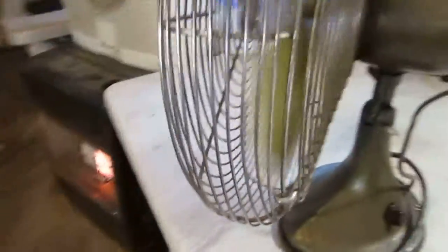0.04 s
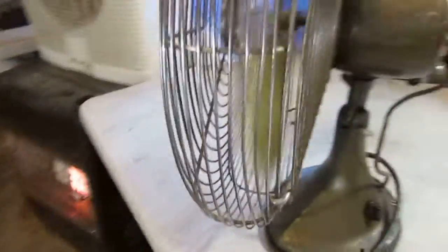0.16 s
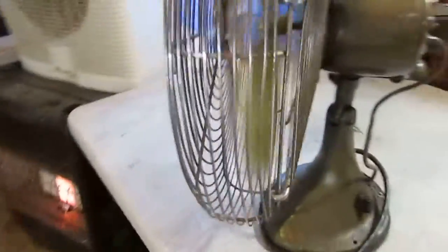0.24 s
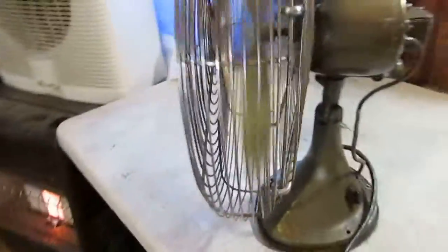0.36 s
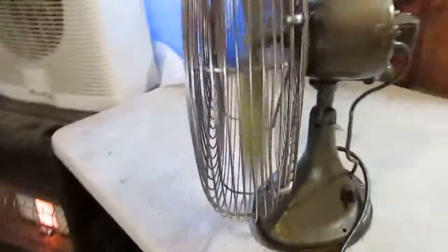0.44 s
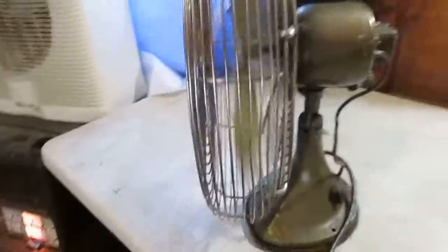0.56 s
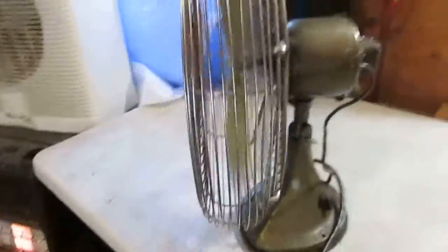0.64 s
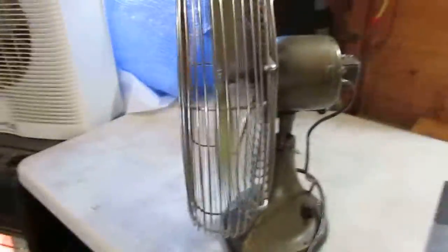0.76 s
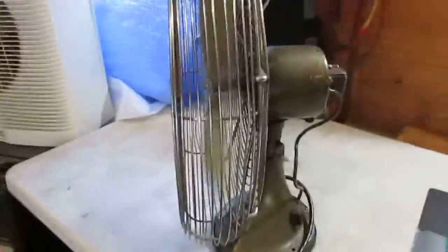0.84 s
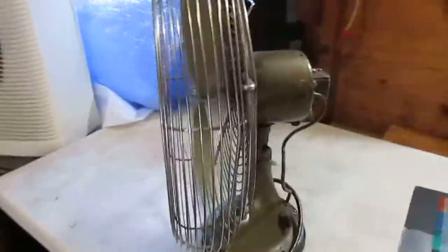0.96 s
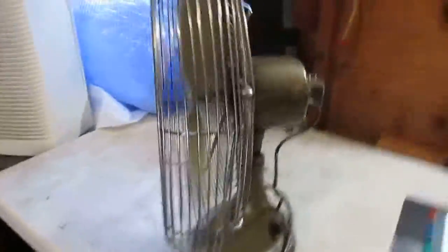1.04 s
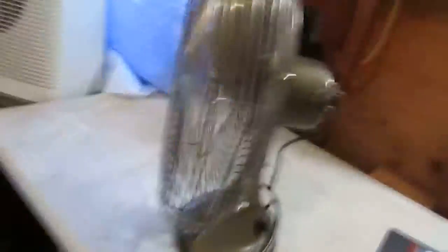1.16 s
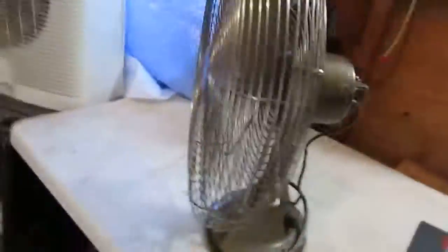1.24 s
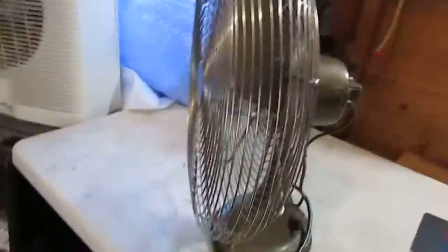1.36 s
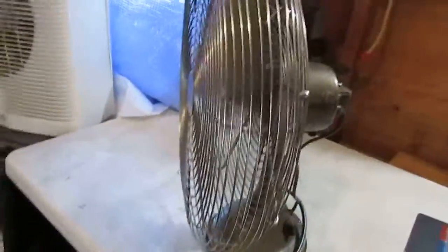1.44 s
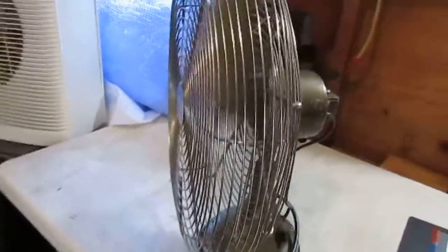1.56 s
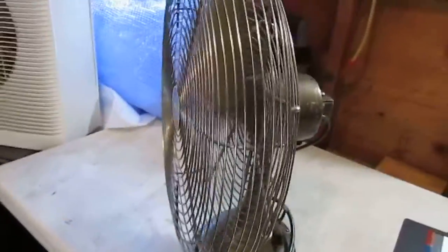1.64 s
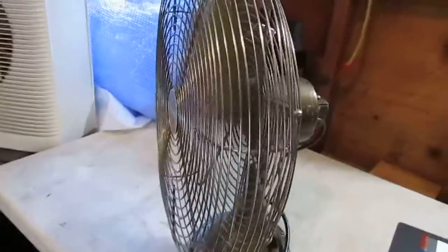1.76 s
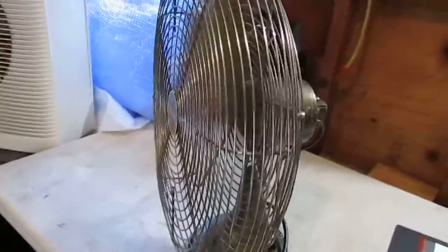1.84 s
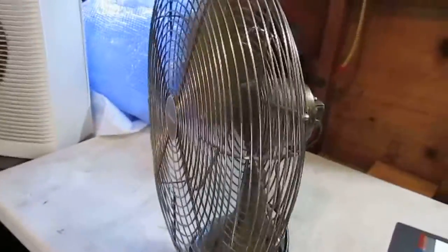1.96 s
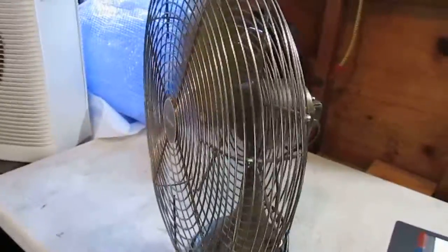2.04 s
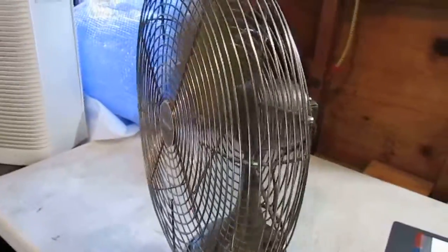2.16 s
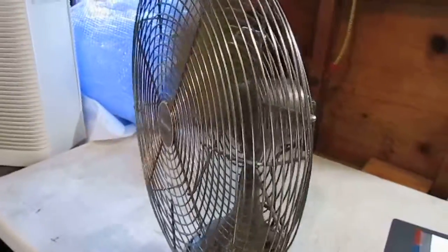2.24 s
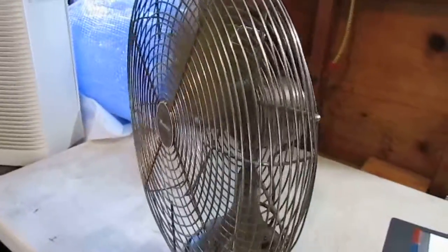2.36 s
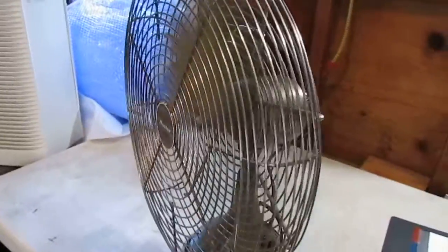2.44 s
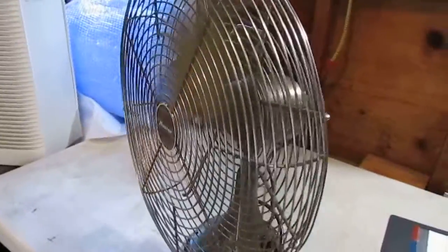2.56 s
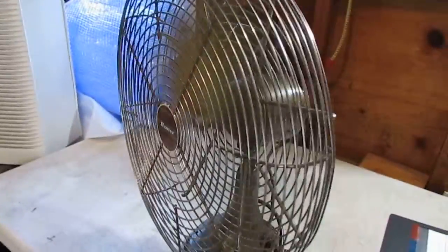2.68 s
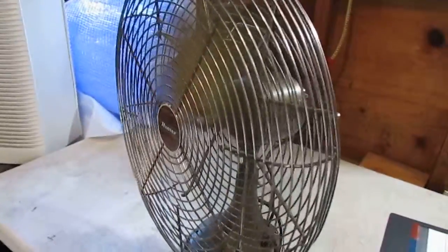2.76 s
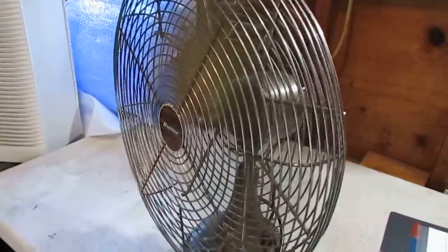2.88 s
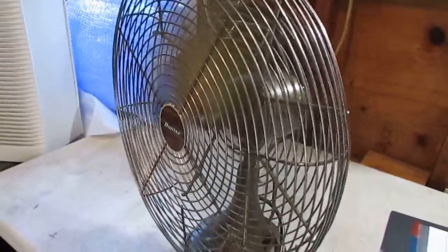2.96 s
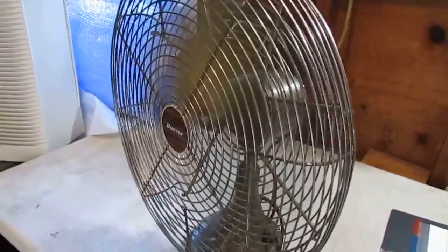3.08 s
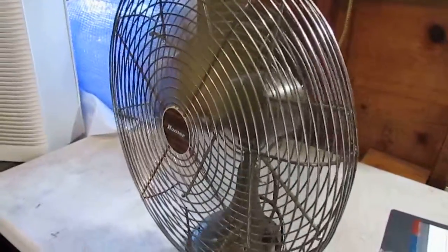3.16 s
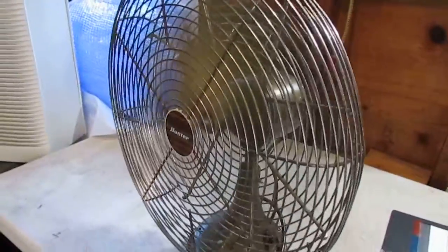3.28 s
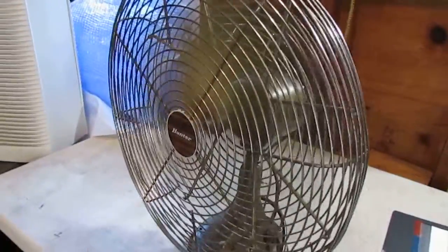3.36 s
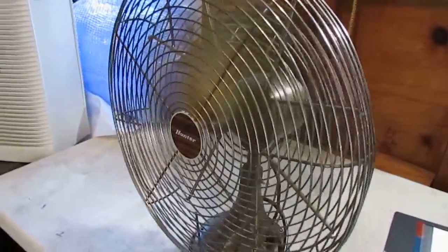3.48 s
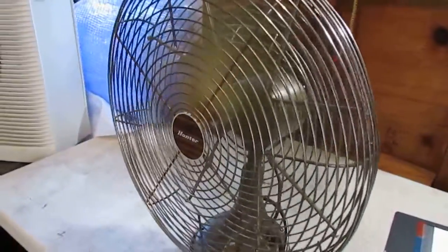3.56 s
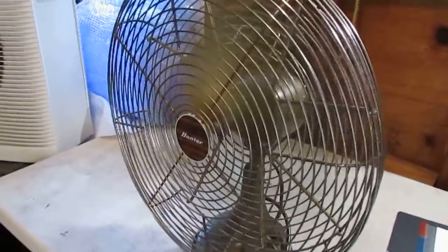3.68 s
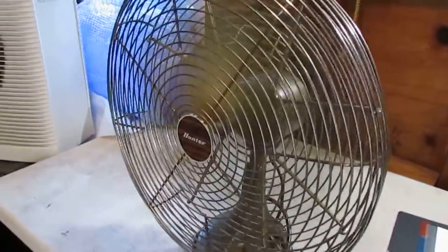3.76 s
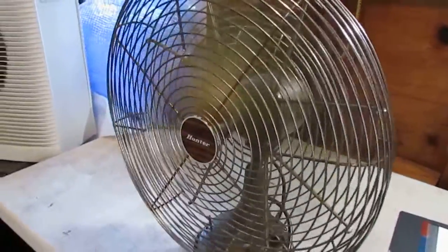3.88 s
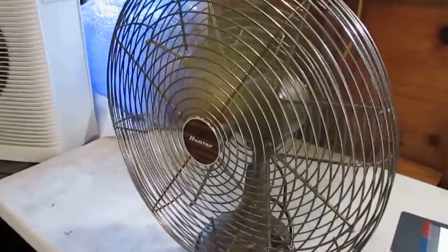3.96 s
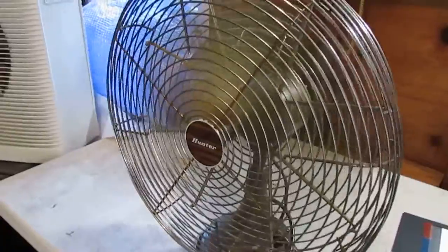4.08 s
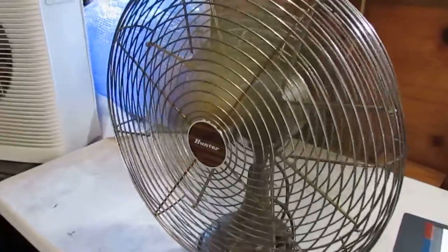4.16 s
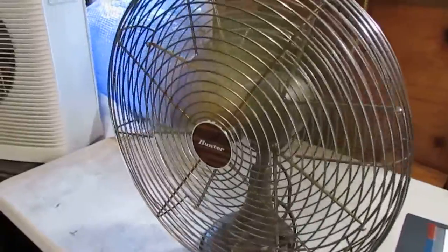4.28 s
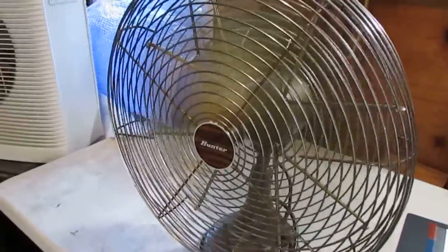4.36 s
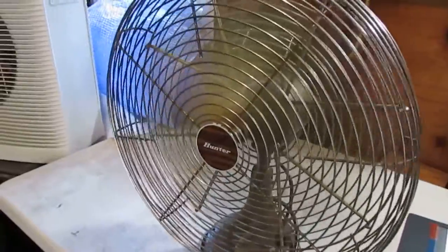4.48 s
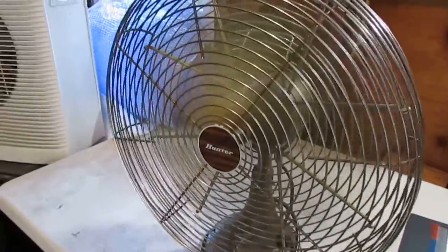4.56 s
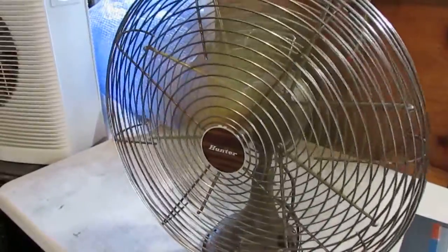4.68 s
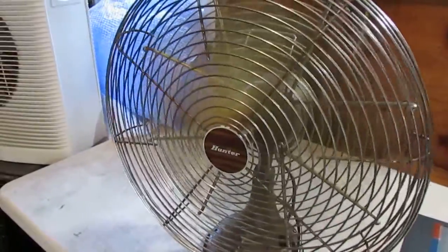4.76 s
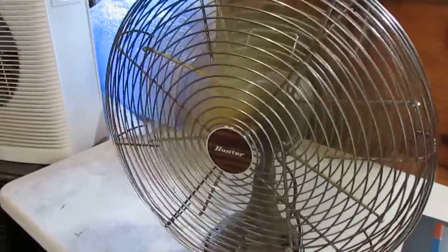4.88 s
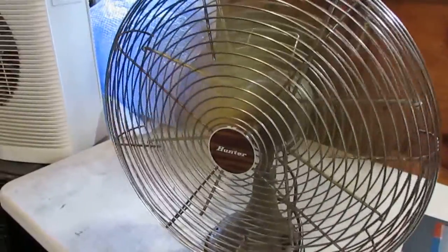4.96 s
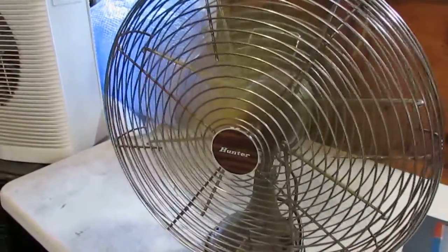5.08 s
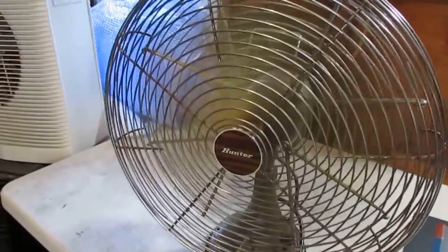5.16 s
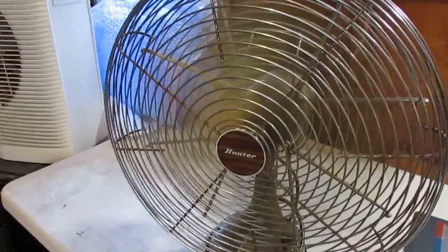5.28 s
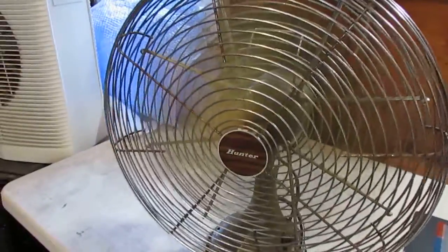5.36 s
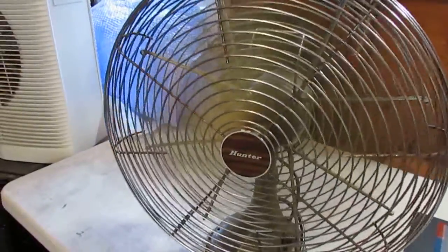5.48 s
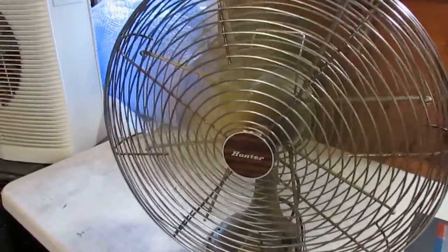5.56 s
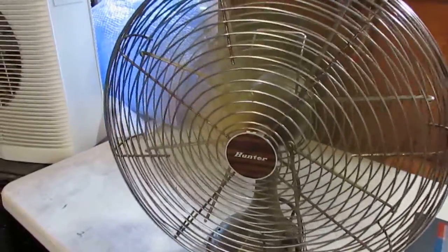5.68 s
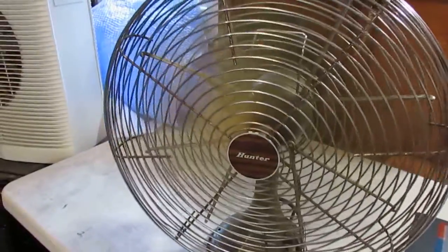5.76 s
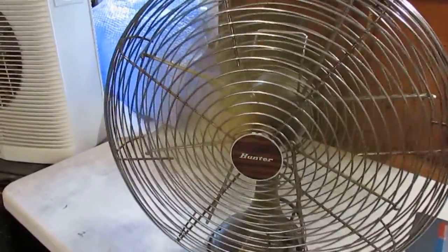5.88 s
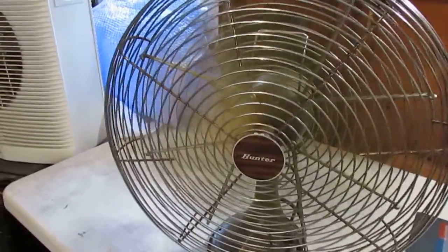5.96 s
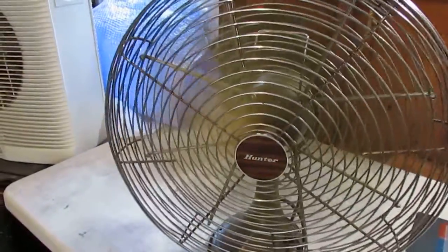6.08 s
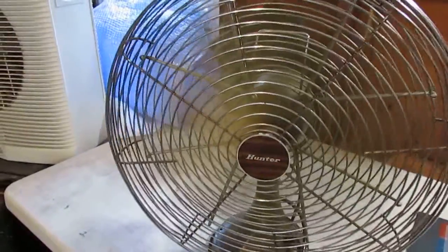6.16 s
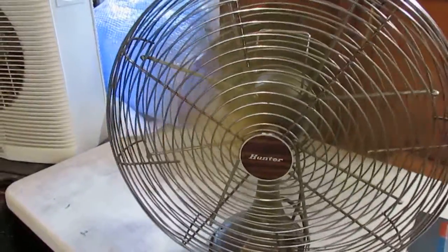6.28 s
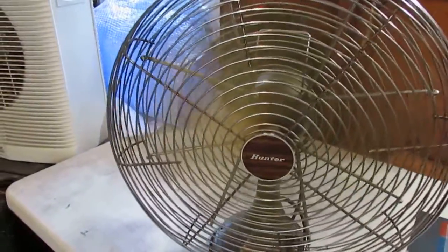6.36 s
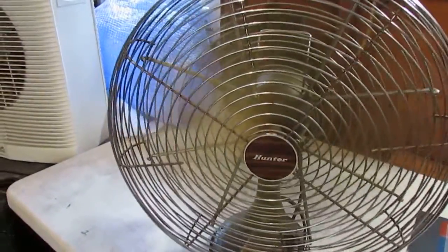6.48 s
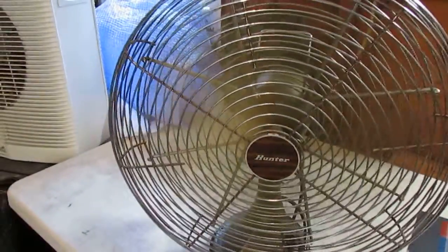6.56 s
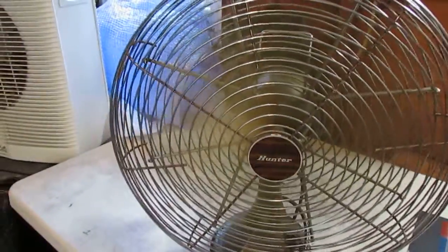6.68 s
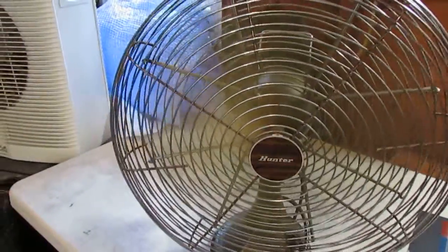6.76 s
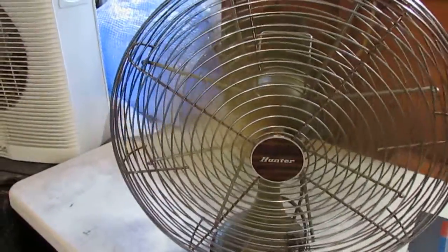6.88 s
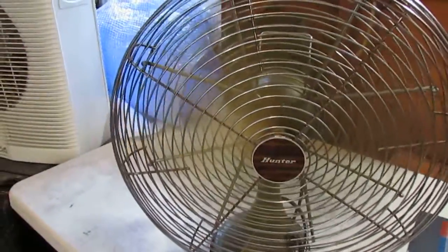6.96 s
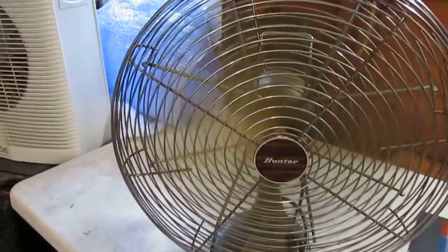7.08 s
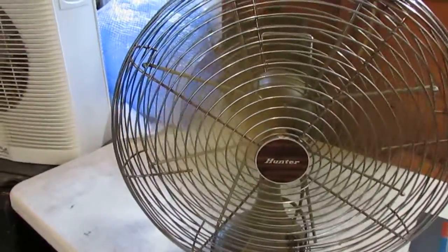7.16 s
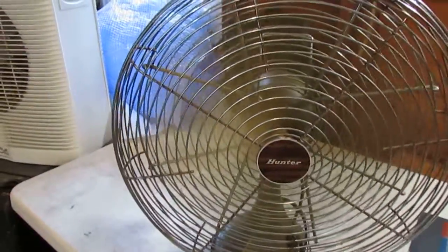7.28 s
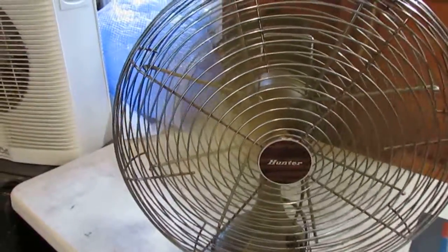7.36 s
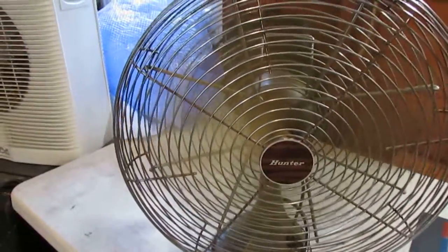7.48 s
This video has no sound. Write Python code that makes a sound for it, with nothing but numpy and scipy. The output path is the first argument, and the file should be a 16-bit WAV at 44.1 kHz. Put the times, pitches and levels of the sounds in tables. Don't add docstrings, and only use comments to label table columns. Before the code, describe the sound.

From 0 to 0.5 s there is only quiet shed tone: low rumble, faint mains hum and thin high electronic whine. At 0.5 s a finger rubs the case, a dense gritty scrape with a brief squeak, lasting to about 0.8 s. A switch snaps at 0.69 s and slides, then at 0.80-0.83 s heavy close thumps overload the microphone, with a tiny hiss of escaping air. The level clamps down. Around 1.0-1.2 s a strap ticks and a buckle rattles lightly. Meanwhile the fan emerges: broad rushing air, steady 120 Hz hum and wavering low blade tones, swelling until roughly 5 s as the microphone circles to the front, then running steadily. Soft wind rumble begins near 5.6 s. Hard, lumpy air puffs strike at 6.5, 6.65 and 6.87 s, ducking the fan, with smaller buffets and another strong one near 7.4 s until the end at 7.5 s.

```python
import sys
import numpy as np
from scipy import signal
from scipy.fft import rfft, irfft
from scipy.io import wavfile

SR = 44100
rng = np.random.default_rng(int(sys.argv[2]) if len(sys.argv) > 2 else 0)


def to_wav(s):
    ch = np.atleast_2d(s).T
    pcm = np.round(np.clip(ch, -1, 1) * 32767)
    wavfile.write(sys.argv[1], SR, pcm.astype(np.int16))


def field_ratio(decibels):
    return 10 ** (np.asarray(decibels, dtype=float) / 20)


N = 332073
TIME = np.arange(N) / SR
MAINS_HZ = 120.03

# pitch_hz, level_db (rms)
WHINE = [(3914, -75), (3941, -79), (11763, -77), (11792, -84), (11822.5, -73), (11881, -86)]
# freq_hz, level_db (per Hz)
TICK_BRIGHT = [(3000, -23), (5500, -10), (7500, 1.5), (8600, -3.5), (10200, -3.5), (12500, -20),
               (16000, -20)]


def rms_one(x):
    return x / np.sqrt(np.mean(x ** 2) + 1e-20)


def noise():
    return rng.standard_normal(N)


def in_time(rows, outside=None):
    s, *columns = np.transpose(rows)
    return [np.interp(TIME, s, c, left=outside, right=outside) for c in columns]


def drift(rate):
    r = np.exp(-80 * np.pi * rate / SR)
    slow = signal.lfilter([1], [1, -2 * r, r * r], rng.standard_normal(N // 40 + 4002))[4000:]
    return np.interp(np.arange(N) / 40, np.arange(len(slow)), rms_one(slow))


def coloured(x, spectrum, peaks=()):
    hz = np.maximum(np.arange(N // 2 + 1) * SR / N, 1)
    points = np.array(spectrum)
    db = np.interp(np.log(hz), np.log(points[:, 0]), points[:, 1])
    for centre_hz, width_hz, top_db in peaks:
        db = db + top_db / (1 + (2 * (hz - centre_hz) / width_hz) ** 2)
    return rms_one(irfft(rfft(x) * field_ratio(db), N))


def grains(per_s, spread_db):
    sizes = field_ratio(spread_db * np.minimum(rng.exponential(1, N), 4)) * rng.choice([-1, 1], N)
    return sizes * (rng.random(N) < per_s / SR)


def sines(lines):
    return sum(field_ratio(db + 3) * np.sin(2 * np.pi * hz * TIME) for hz, db in lines)


def bursts(rows, rise_db_per_s, fall_db_per_s):
    out = np.zeros(N)
    for s, hold, db in rows:
        early_s = np.maximum(s - TIME, 0)
        late_s = np.maximum(TIME - s - hold, 0)
        out += field_ratio(db - rise_db_per_s * early_s - fall_db_per_s * late_s)
    return out


def struck(seconds, level_db, t60):
    out = np.zeros(N)
    for s, db in zip(seconds, level_db):
        near = slice(int(s * SR), int((s + .05) * SR))
        out[near] += field_ratio(db - 60 * (TIME[near] - s) / t60)
    return out


def swings(rows, cycles, phases):
    out = np.zeros(N)
    for (s, db, hz), phase in zip(rows, phases):
        near = slice(int((s - .03) * SR), int((s + .03) * SR))
        turns = (TIME[near] - s) * hz
        out[near] += field_ratio(db) * np.exp(-(2 * turns / cycles) ** 2) * np.sin(2 * np.pi * turns + phase)
    return out


def shed():
    # freq_hz, level_db (per Hz)
    room_colour = [(79, -30), (135, -1), (160, -15), (283, -5.5), (580, -14.5), (640, -8.5), (695, -23.5),
                   (1060, -27.5), (2000, -54), (4000, -110)]
    hand_colour = [(10, -17), (22, -3), (50, 10), (75, 3.5), (110, -8), (160, -45), (400, -110)]
    floor_colour = [(500, -20), (1000, -6.5), (2000, -10), (3500, -12.5), (5000, -16), (6500, -19.5),
                    (11000, -23), (14000, -30), (16000, -40.5)]
    # pitch_hz, level_db (rms)
    shed_hum = [(59.5, -48), (120, -50)]

    before_change = 1 / (1 + np.exp(np.clip((TIME - .812) / 0.0067, -50, 50)))
    room_db = -45 + 11.5 * TIME
    hand_db = -41.5 + 2.8 * drift(9.0)
    room = field_ratio(room_db) * coloured(noise() * field_ratio(1.6 * drift(16)), room_colour)
    hand = field_ratio(hand_db) * coloured(noise(), hand_colour)
    floor = field_ratio(-60) * coloured(noise(), floor_colour)
    return (room + hand + floor + sines(WHINE + shed_hum)) * before_change


def finger_rub():
    # time_s, level_db
    pressure_curve = [
        (0.49, -45),
        (0.502, -5),
        (0.545, 0.5),
        (0.59, -1),
        (0.65, 2.5),
        (0.672, -7),
        (0.7, 1.5),
        (0.795, -3),
        (0.83, -24),
    ]
    # freq_hz, level_db (per Hz)
    body_colour = [(35, -36), (60, -9.5), (173, -6.5), (422, 3), (478, -3.5), (620, -1.5), (1600, -28),
                   (2080, -36.5), (3520, -120)]
    scrape_colour = [(590, -27), (1000, 5), (1220, -4.5), (1980, 0), (2280, -12), (3120, -13.5),
                     (4520, -19.5), (5310, -29.5), (7190, -18), (7980, -21), (10700, -32), (12100, -41.5),
                     (16000, -68)]
    squeak_colour = [(5500, -26), (6500, -10), (7080, -1.5), (7600, -13.5), (9000, -38.5)]
    # freq_hz, width_hz, level_db
    case_peaks = [(2000, 300, -2.5), (3100, 440, 7), (6950, 540, -2)]

    press_db, = in_time(pressure_curve, outside=-120)
    tired_db = 60 * np.maximum(TIME - .64, 0)
    squeak_db = -49 + 2.6 * press_db - tired_db
    body = field_ratio(-28 + press_db) * coloured(grains(970, 1.5), body_colour)
    scrape = field_ratio(-37 + press_db) * coloured(grains(11000, 1.8), scrape_colour, case_peaks)
    squeak = field_ratio(squeak_db) * coloured(grains(5000, 2.7), squeak_colour, [(7100, 300, 5.8)])
    return body + scrape + squeak


def switch():
    # time_s, peak_db, pitch_hz
    snap_swings = [
        (0.6880, -20, 3000),
        (0.6884, -12, 1700),
        (0.6893, -4.5, 660),
        (0.6908, -13, 330),
        (0.7915, -15, 450),
    ]
    # start_s, hold_s, level_db
    slide_strokes = [
        (0.689, 0.00098, -20),
        (0.698, 0.019, -25),
    ]
    # freq_hz, level_db (per Hz)
    slide_colour = [(530, -26), (900, 8.5), (1780, -19), (2140, 4.5), (3270, -19), (3850, -10), (5210, -25),
                    (6980, -37), (12000, -54.5), (15600, -79), (22000, -120)]

    snap = swings(snap_swings, 2.8, np.full(len(snap_swings), np.pi / 2))
    return snap + bursts(slide_strokes, 6000, 8000) * coloured(noise(), slide_colour)


def grip_nudges():
    # time_s, peak_db, pitch_hz
    shifts = [
        (0.71, -20.5, 120),
        (0.752, -20, 386),
        (0.768, -18.5, 330),
        (0.783, -19, 397),
        (0.845, -42, 65),
        (1.135, -68, 45),
        (1.137, -48, 170),
        (1.185, -66, 60),
        (1.19, -54.5, 180),
    ]
    return swings(shifts, 2.6, np.zeros(len(shifts)))


def thump():
    # time_s, peak_db, width_s, overshoot_share
    blows = [
        (0.8030, 3, .0031, .6),
        (0.8092, -9, .0012, 0),
        (0.8117, 4.5, .0011, .42),
        (0.8175, -3, .00035, .3),
        (0.8198, 0, .0005, .45),
        (0.8265, -10.5, .003, .1),
    ]
    out = np.zeros(N)
    for s, db, width, rebound in blows:
        near = slice(int((s - .02) * SR), int((s + .04) * SR))
        u = (TIME[near] - s) / width
        late = np.maximum(u - .55, 0) / .75
        dip = np.exp(-(1.5 * u) ** 4)
        out[near] += field_ratio(db) * (rebound * late * np.exp(1 - late) - dip)
    return out


def port_hiss():
    # start_s, hold_s, level_db
    escapes = [
        (0.814, .01, -45.5),
        (0.827, .003, -42.5),
        (0.84, 0.038, -63),
    ]
    # freq_hz, level_db (per Hz)
    port_colour = [(500, -11), (2000, -2), (4500, 5.5), (8000, 6), (11000, -9), (16000, -24)]
    return bursts(escapes, 3000, 1300) * coloured(noise(), port_colour)


def gain_control():
    # time_s, slow_loss_db, quick_loss_db
    clamps = [
        (0.815, 22.5, 14.5),
        (6.51, 6, 1),
        (6.87, 4.5, 4.5),
    ]
    open_db, slow_db_per_s, quick_s, grip_s = -34.5, 5, 0.44, 0.0064
    loss_db = np.zeros(N)
    for s, slow_db, quick_db in clamps:
        since = np.maximum(TIME - s, 0)
        depth_db = np.maximum(slow_db - slow_db_per_s * since, 0) + quick_db * np.exp(-since / quick_s)
        attack = 1 + np.exp(np.clip((s - TIME) / grip_s, -50, 50))
        loss_db = np.maximum(loss_db, depth_db / attack)
    return field_ratio(open_db - loss_db) * (TIME > clamps[0][0] + .018)


def fan():
    # time_s, rate_hz
    blade_rate = [(0.8, 62.6), (2.3, 62.88), (2.9, 63.2), (4.05, 63.38), (4.35, 63.15), (6.5, 64.2),
                  (7.53, 64.5)]
    blade_tones = [-24, -13, 0, -13, -8, -12, -19, -21, -21, -12, -10, -17, -10, -21]
    # freq_hz, level_db (per Hz)
    rush_colour = [(20, -21), (64, -53), (100, -14.5), (250, -18), (500, -13), (700, -5.5), (1000, -10.5),
                   (2000, -12), (3000, -17), (4300, -25), (6600, -30.5), (12000, -35.5), (14000, -44),
                   (16000, -47)]
    far_colour = [(25, -24), (45, -16), (65, -1), (100, -6), (160, -13), (300, -3), (640, 1), (750, -22),
                  (3000, -30)]
    # freq_hz, width_hz, level_db
    cage_peaks = [(330, 45, 7), (650, 160, 0), (850, 130, 3), (1428, 230, 4.5), (2240, 1800, 1),
                  (5257, 1330, 12.5)]

    rate_hz = in_time(blade_rate)[0] * (1 + .0004 * drift(2.5))
    turn = 2 * np.pi * np.cumsum(rate_hz) / SR
    white = noise() * field_ratio(0.072 * drift(21) + 0.13 * np.cos(turn))
    rush = field_ratio(5.5) * coloured(white, rush_colour, cage_peaks)

    blade_db = 3.5 - 15.5 * np.exp(-(np.maximum(TIME - .85, 0) / 0.87) ** 2)
    tones = np.zeros(N)
    for k, db in enumerate(blade_tones, 1):
        tones += field_ratio(db + (1.7 + 0.05 * k) * drift(3.8)) * np.cos(k * turn)
    hum = field_ratio(6.5 + 0.48 * drift(8.0)) * np.sin(2 * np.pi * MAINS_HZ * TIME)

    far_db = -1.4 - 16.5 / (1 + np.exp((3.13 - TIME) / 0.61))
    far_hum = field_ratio(-3.0 + 1.2 * drift(3.0)) * np.sin(np.pi * MAINS_HZ * TIME)
    far = field_ratio(far_db) * (coloured(noise(), far_colour) + far_hum)
    whine = field_ratio(35) * sines(WHINE[2:])
    return gain_control() * (rush + field_ratio(blade_db) * tones + hum + far + whine)


def strap_and_buckle():
    # time_s, peak_db
    strap_ticks = [
        (0.9815, -52),
        (0.997, -26.5),
        (1.003, -33.5),
        (1.0124, -41),
        (1.0204, -38),
        (1.033, -35),
        (1.0424, -41.5),
        (1.177, -41),
        (1.2114, -47),
    ]
    buckle_knocks = [
        (1.068, -20.5),
        (1.076, -29),
        (1.081, -26),
        (1.0868, -27.5),
        (1.0924, -22),
        (1.099, -22),
        (1.1178, -27),
        (1.1203, -27),
        (1.1374, -24.5),
    ]
    # freq_hz, level_db (per Hz)
    ring_colour = [(300, -2.5), (1100, -4), (2000, 0), (4000, -9), (6000, -25)]

    bright, ring = np.zeros(N), np.zeros(N)
    for rows, ring_db, t60_s in [(strap_ticks, -28, .012), (buckle_knocks, -15.5, 0.0093)]:
        s, db = np.transpose(rows)
        bright += struck(s, db - 5.0, t60_s)
        ring += struck(s, db + ring_db, 2.06 * t60_s)
    rattle = bright * coloured(noise(), TICK_BRIGHT)
    return rattle + ring * coloured(noise(), ring_colour, [(1140, 170, 12.0)])


def strap_rustle():
    # start_s, hold_s, level_db
    brushes = [
        (1.0, 0.046, -53),
        (1.06, 0.034, -59),
        (1.19, .015, -62),
    ]
    return bursts(brushes, 1000, 1500) * coloured(grains(4000, 2.5), TICK_BRIGHT)


def wind():
    # start_s, hold_s, level_db
    gust_strokes = [(5.9, 0.059, -35), (6.33, 0.076, -26), (6.47, 0.04, -22.5), (6.58, 0.0042, -30),
                    (6.645, 0.022, -21), (6.86, .01, -23.5), (6.915, 0.01, -27), (6.98, 0.0092, -32),
                    (7.025, 0.037, -29), (7.19, 0.012, -29.5), (7.31, 0.004, -29), (7.375, 0.067, -24),
                    (7.49, .04, -32)]
    # time_s, peak_db, pitch_hz
    puffs = [(6.4577, -13, 400), (6.4655, -10, 252), (6.4861, -9, 284), (6.494, -10.5, 258),
             (6.502, -3, 225), (6.5072, -2, 450), (6.5148, -0.7, 377), (6.533, -14, 274),
             (6.6384, -5.5, 210), (6.647, -6.5, 476), (6.6508, -12, 416), (6.66, -9.5, 229),
             (6.6695, -10.5, 234), (6.678, -12, 265), (6.8554, -7.5, 410), (6.8607, -7.5, 334),
             (6.8675, 0.5, 330), (6.911, -12, 323), (6.9225, -8.5, 228), (6.9282, -11.5, 396),
             (7.0185, -12, 273), (7.0248, -10, 261), (7.0436, -17, 384), (7.181, -15.5, 225),
             (7.3923, -13.5, 330), (7.4015, -10, 218), (7.427, -8, 220), (7.4343, -12, 210),
             (7.4411, -2, 207), (7.5265, -14.5, 238)]
    # freq_hz, level_db (per Hz)
    wind_colour = [(12, -18), (30, -9), (60, -5.5), (110, -4.5), (200, -8), (400, -32.5), (800, -49),
                   (2000, -110)]
    eddy_colour = [(60, -30), (270, 4), (500, -11), (1000, -40), (2000, -90)]

    lumpy = noise() * field_ratio(2.2 * drift(25))
    breeze = bursts([(5.56, 9, -40.5)], 120, 0)
    gusts = bursts(gust_strokes, 600, 452) + breeze
    eddies = coloured(grains(90, 1.7), eddy_colour)
    rumble = gusts * (coloured(lumpy, wind_colour) + field_ratio(-10) * eddies)
    phases = 2 * np.pi * rng.random((len(puffs), 2))
    snaps = [(s, 1.37 * db - 1.0, 1.7 * hz) for s, db, hz in puffs]
    pressure = rumble + swings(puffs, 1.35, phases[:, 0]) + swings(snaps, 0.99, phases[:, 1])
    return .95 * np.tanh(pressure / .95)


def scene():
    handling = finger_rub() + switch() + grip_nudges() + thump() + port_hiss()
    strap = strap_and_buckle() + strap_rustle()
    return (shed() + handling + fan() + strap + wind())[None]


def roll_off(x):
    return signal.sosfilt(signal.butter(12, 16480, fs=SR, output="sos"), x)


def record(dry):
    notched = signal.lfilter(*signal.iirnotch(7867, 45.0, fs=SR), dry)
    overloaded = np.clip(notched, -1, 1)
    top_cut = signal.cheby2(14, 60, 15900, fs=SR, output="sos")
    return roll_off(signal.sosfilt(top_cut, overloaded))


dry = scene()
out = record(dry)
to_wav(out)
```